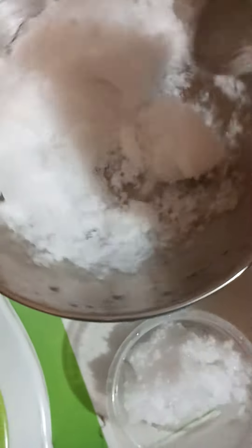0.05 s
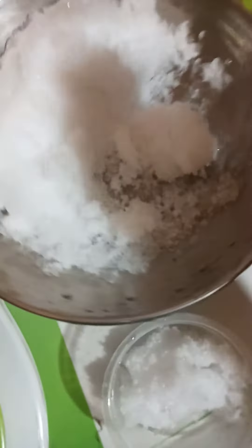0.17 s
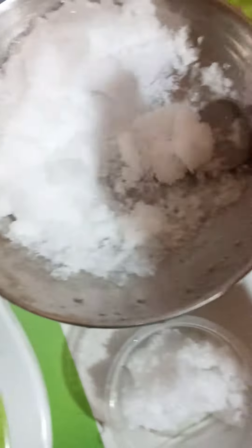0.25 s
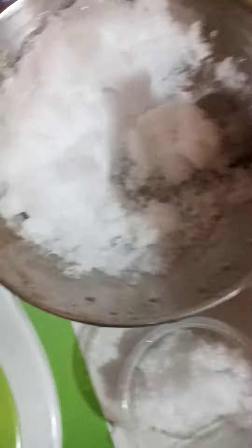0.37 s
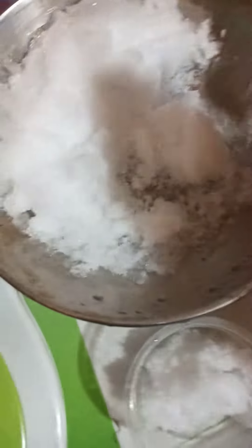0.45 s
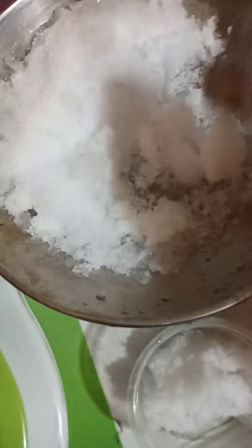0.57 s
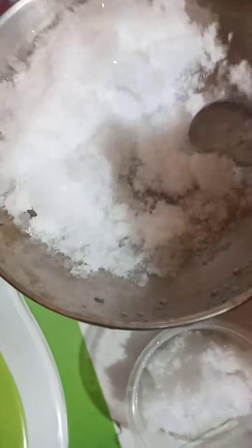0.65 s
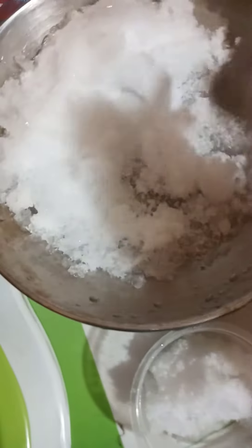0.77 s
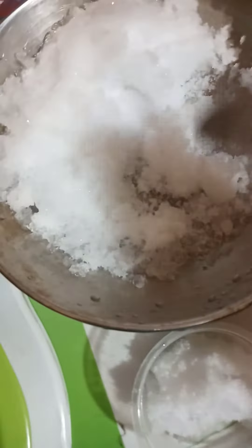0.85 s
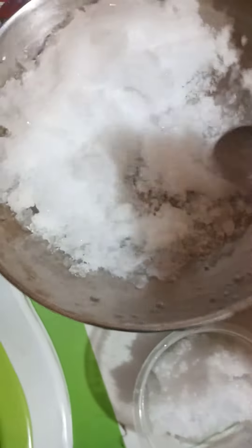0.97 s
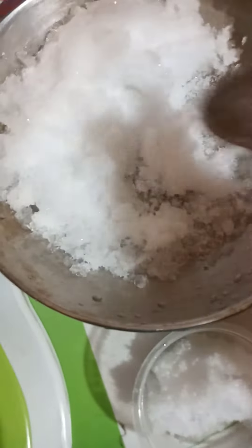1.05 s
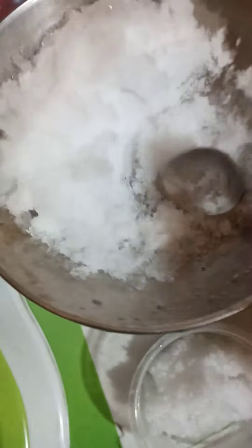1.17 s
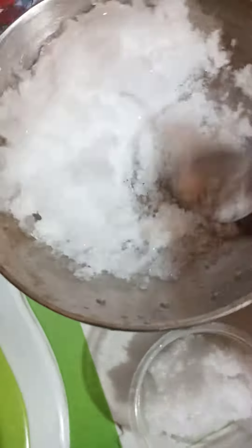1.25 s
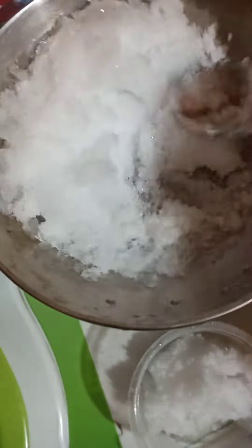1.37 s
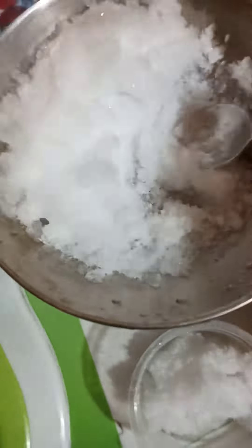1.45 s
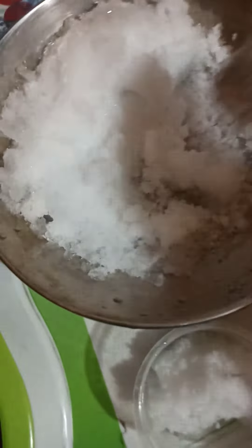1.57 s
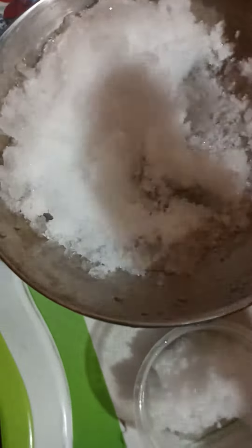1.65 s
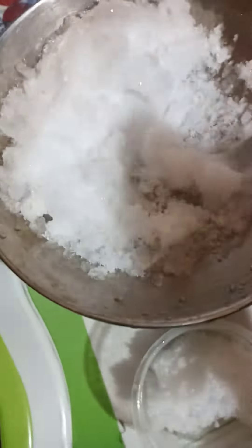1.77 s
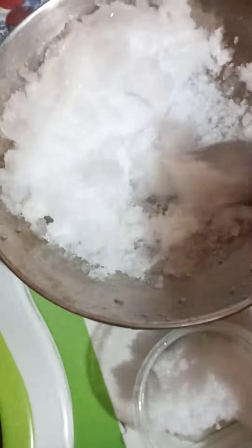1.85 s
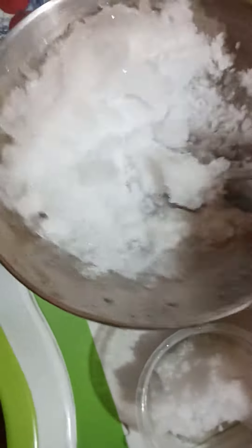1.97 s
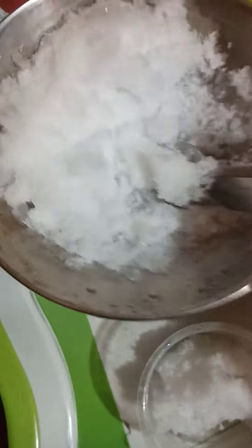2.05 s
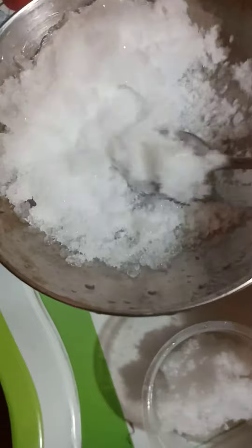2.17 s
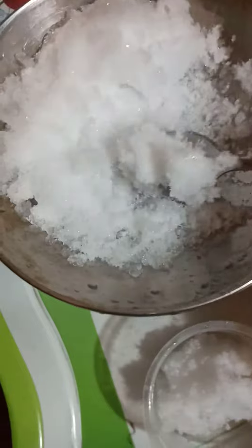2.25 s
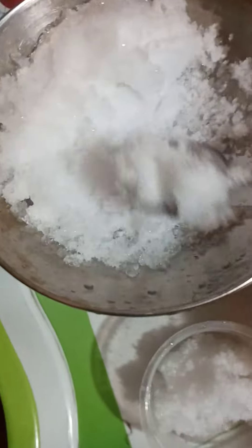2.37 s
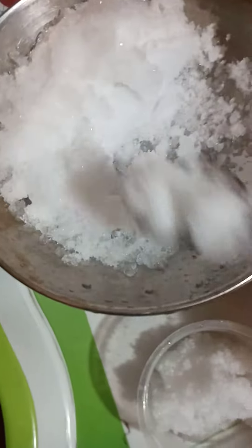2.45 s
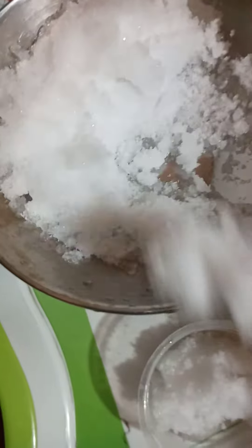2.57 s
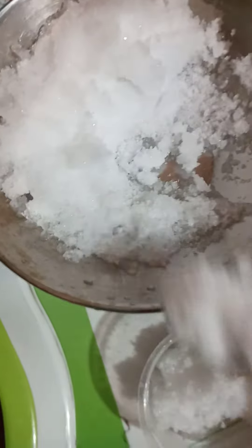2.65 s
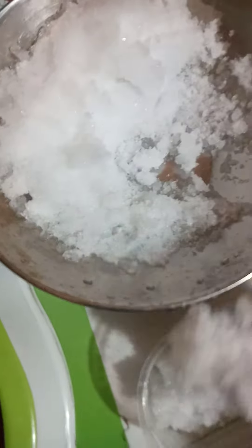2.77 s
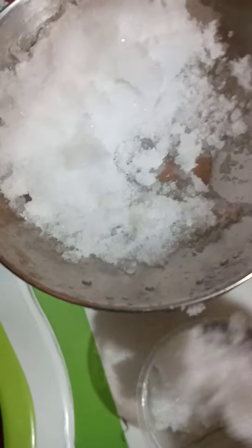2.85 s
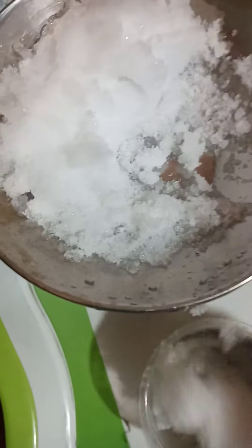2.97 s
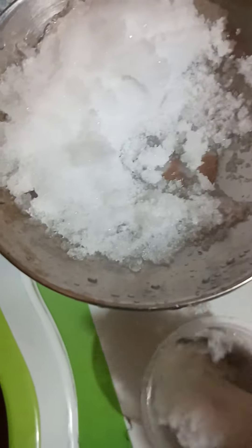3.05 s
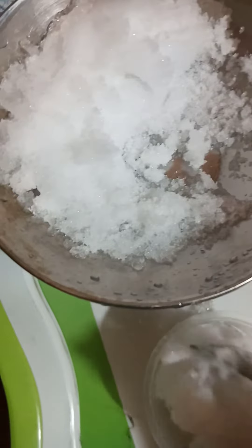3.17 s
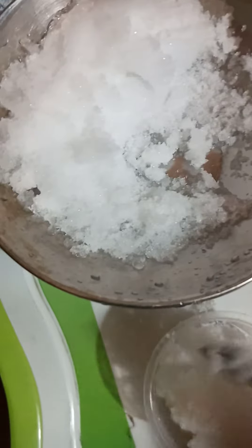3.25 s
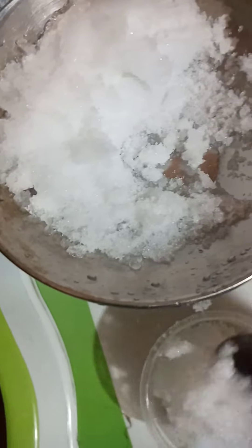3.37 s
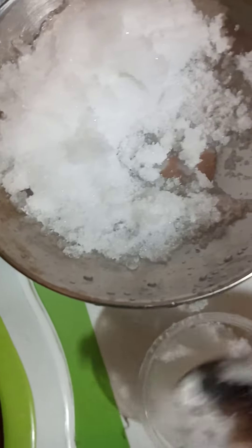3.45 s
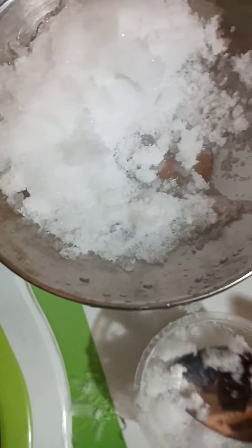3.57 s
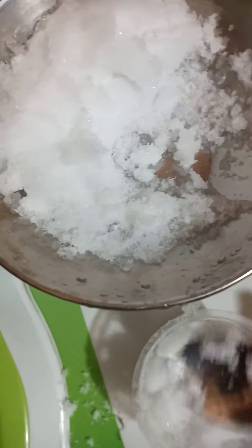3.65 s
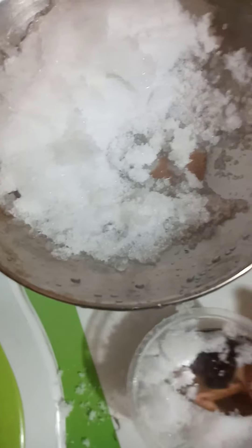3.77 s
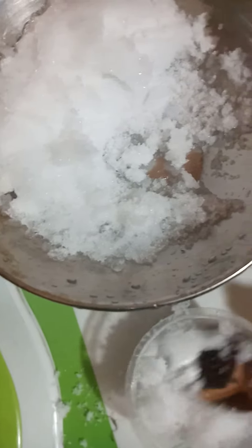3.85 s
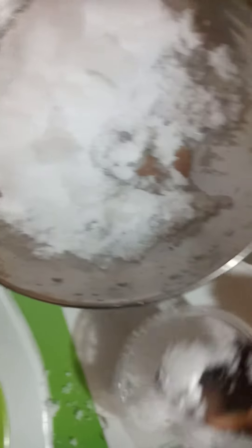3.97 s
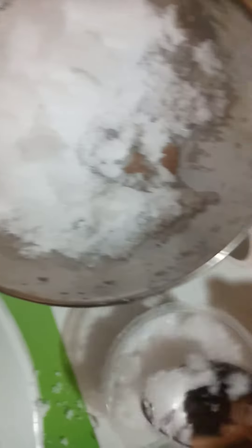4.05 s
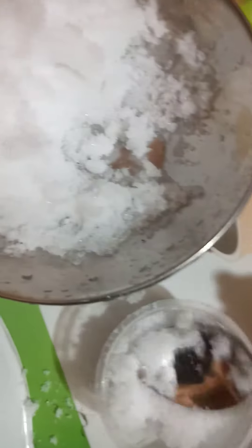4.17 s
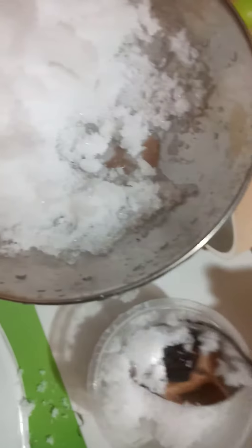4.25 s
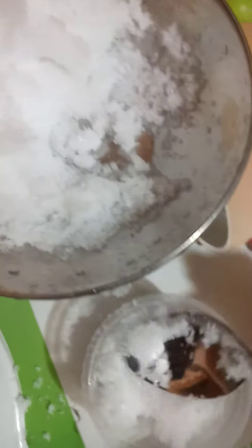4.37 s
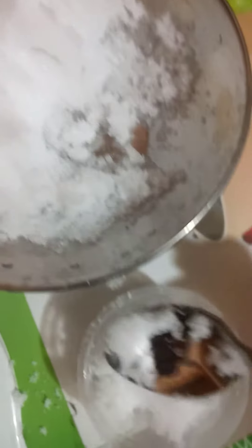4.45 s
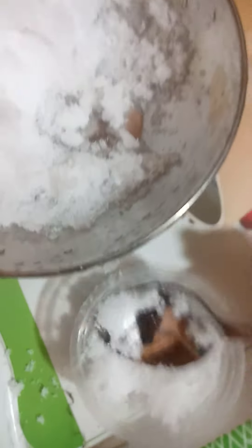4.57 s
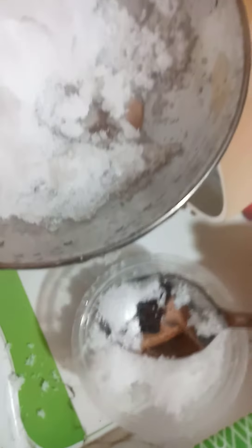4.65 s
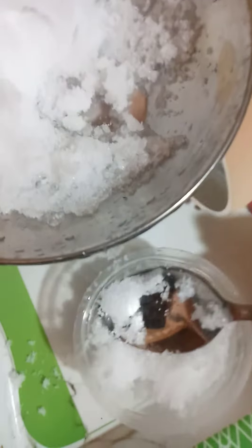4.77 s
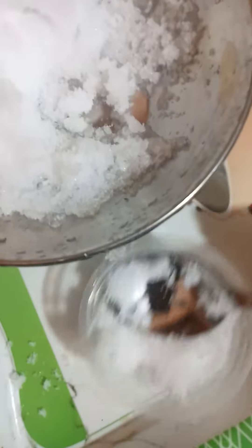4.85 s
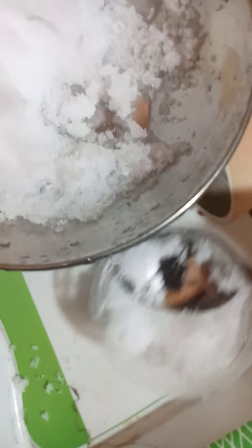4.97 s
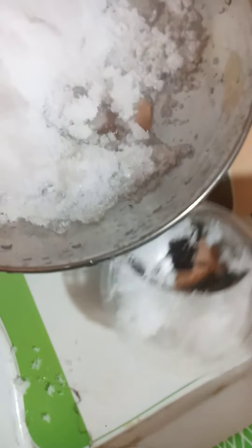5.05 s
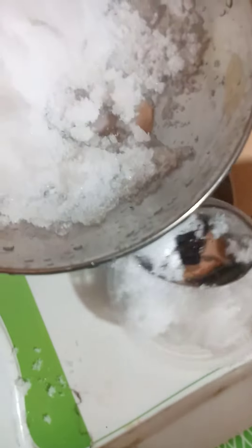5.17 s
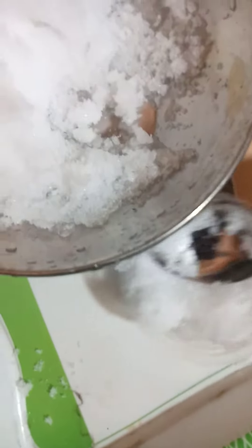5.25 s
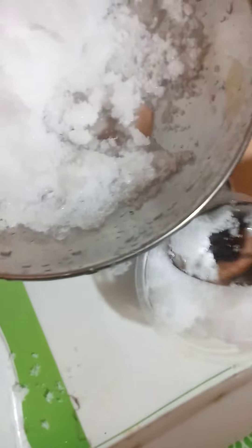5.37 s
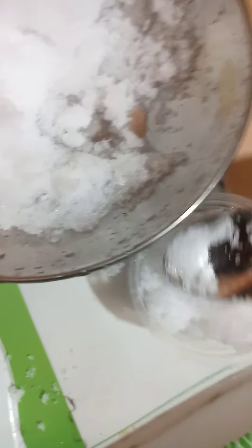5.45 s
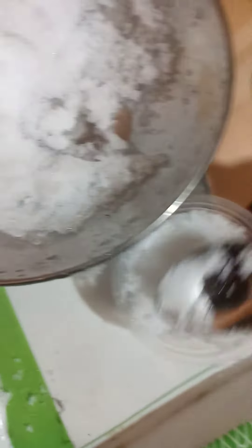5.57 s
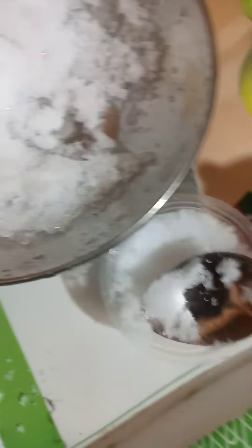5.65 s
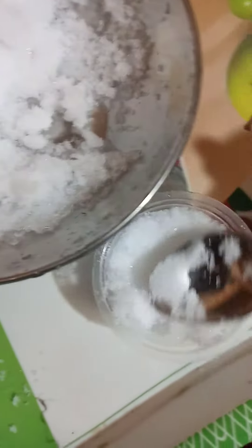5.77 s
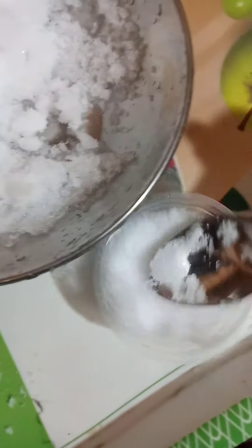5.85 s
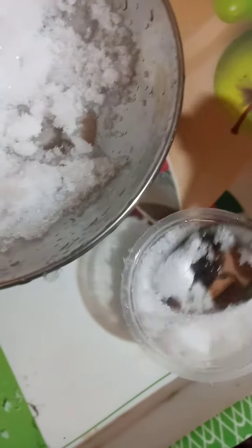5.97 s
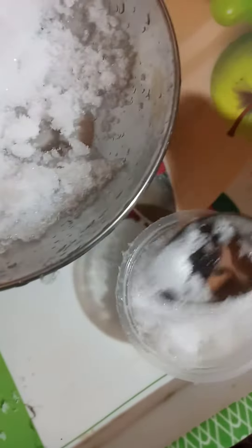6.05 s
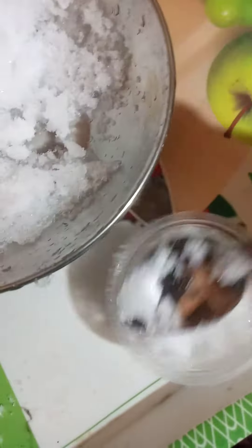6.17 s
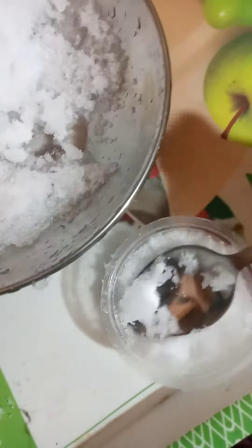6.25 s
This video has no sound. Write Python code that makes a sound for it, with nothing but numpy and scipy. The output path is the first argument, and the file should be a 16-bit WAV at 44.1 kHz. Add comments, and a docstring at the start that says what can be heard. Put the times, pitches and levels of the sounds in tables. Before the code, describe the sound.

In a small kitchen, close to a phone microphone, a spoon works coarse freezer frost in a steel bowl. From 0 to 2.1 s come uneven short scrapes and gritty crunches, with strong snaps near 0.2, 1.15, 1.4 and 1.75 s, brief damped metallic ringing and dull table thuds. It quietens around 2.1 to 2.6 s with only tiny cracks. A sharp snap at 2.65 s starts the work in the small tub: crisper, higher crunches and bright ticks around 3 s, a swelling crunch to a hard crack at 3.5 to 3.65 s, and a cluster of cracks near 4.05 to 4.15 s. From 4.6 to 5.5 s there are only faint crackles and soft pressing. Short clicks and crunches return at 5.6 to 5.9 s, and a firmer tap with a thud ends it near 6.2 s. Faint room echo, airy noise and wavering low machine hum lie underneath.

```python
"""A spoon chops and scoops freezer frost in a steel bowl, then goes on in a small tub and presses it flat.
Clumps of short grains make the crunches, pitched cracks make the snaps; decaying modes ring the vessels.
The place is a small kitchen: filtered noise gives its air, low machine drones and the thuds of the table.
The frost lies close to a phone microphone, with faint echoes of the room behind it."""
import sys
import numpy as np
from scipy import signal
from scipy.io import wavfile
from scipy.ndimage import uniform_filter1d

SR = 44100
rng = np.random.default_rng(int(sys.argv[2]) if len(sys.argv) > 2 else 0)


def unload_audio(sound):
    """Save the sound as a 16-bit wav file, at the path given as the first command line argument."""
    columns = np.transpose(np.atleast_2d(sound))
    # keep every value between -1 and 1, then stretch to whole-number steps
    steps = np.round(np.clip(columns, -1, 1) * 32767)
    wavfile.write(sys.argv[1], SR, steps.astype(np.int16))


def boost(x):
    """Linear amplitude factor 10**(x/20) for a level x in decibels (scalar or array-like)."""
    u = np.asarray(x, float) / 20
    return 10 ** u


N = 278712  # length [samples]
LEAVES_BOWL_S, PRESSING_BEGINS_S = 2.5, 2.8


def evened(x):
    """Scales to rms 1."""
    return x / np.sqrt(np.mean(x ** 2) + 1e-20)


def slow_noise(size):
    """Noise smoothed twice over size samples, rms 1: an aimless wandering."""
    once = uniform_filter1d(rng.standard_normal(N), size)
    return evened(uniform_filter1d(once, size))


def read(points, hz):
    """Reads a spectrum table on a log-frequency axis."""
    f, value = np.transpose(points)
    return np.interp(np.log(hz + 1), np.log(f + 1), value)


def level_curve(points):
    """Joins (time [s], level [dB]) points by straight lines and gives the amplitude at every sample."""
    s, db = np.transpose(points)
    return boost(np.interp(np.arange(N) / SR, s, db))


def add(mix, s, sound):
    """Mixes a sound in at time s."""
    part = mix[round(s * SR):][:len(sound)]
    part += sound[:len(part)]


def coloured(x, points):
    """A causal minimum-phase filter with the gains of a spectrum table, never below -100 dB."""
    hz = abs(np.fft.fftfreq(8192, 1 / SR))
    log_gain = np.log(boost(np.maximum(read(points, hz), -100)))
    phase = -signal.hilbert(log_gain).imag
    taps = np.fft.ifft(np.exp(log_gain + 1j * phase)).real[:4096]
    return signal.oaconvolve(x, taps)[:N]


def narrow(hz, width, steady=0.):
    """Noise in one steep resonance; steady 0-1 irons out its swells."""
    r = np.exp(-np.pi * width / SR)
    slow = rng.standard_normal(N) + 1j * rng.standard_normal(N)
    for _ in range(2):
        slow = signal.lfilter([1], [1, -r], slow)
    slow = slow / abs(slow) ** np.clip(steady, 0, 1)
    return evened((slow * np.exp(2j * np.pi * hz * np.arange(N) / SR)).real)


def peaked(peak_s, db, rise_db_per_s, fall_db_per_s):
    """A level that climbs to its peak and falls away, both at steady rates."""
    t = np.arange(N) / SR - peak_s
    return boost(db + np.where(t < 0, rise_db_per_s * t, -fall_db_per_s * t))


def resonate(x, hz, width):
    """Shifts the curve hz down to zero, smooths, and shifts back: a resonance of gain 1."""
    turn = np.exp(2j * np.pi * np.cumsum(hz) / SR)
    r = np.exp(-np.pi * width / SR)
    return 2 * (turn * signal.lfilter([1 - r], [1, -r], x / turn + 1e-18)).real


# The spoon drags through frost at even pressure:
# (start [s], length [s], relative level [dB], depth [dB], brightness [dB])
SCRAPES = [(-0.03, 0.014, -37, 14, -1), (0.146, 0.044, -40.5, 9.5, 17.5), (0.251, 0.053, -37.5, 0, 10.5),
           (0.41, 0.069, -54.5, 3.5, -1), (0.567, 0.03, -36, -14.5, 6.5), (0.586, 0.025, -29, 4.5, 4),
           (0.848, 0.023, -29, 3.5, 2.5), (0.953, 0.011, -53.5, 12.5, -6), (1.105, 0.028, -44, -8, -4),
           (1.16, 0.033, -38, 10, 3), (1.363, .048, -29.5, -1.5, 5), (1.681, 0.058, -39, 2.5, 16),
           (1.782, 0.086, -39, -6, 22), (1.892, 0.045, -36.5, 9, 7), (2.005, .012, -33, -1, 8),
           (2.042, 0.1, -49.5, 5, 0.5), (2.23, .14, -55.5, -5, 2.5), (2.648, 0.039, -35, 9, 7),
           (3.14, 0.054, -58.5, 13, -21.5), (3.408, 0.048, -44, 12, 14), (3.803, 0.022, -53, -5, 0),
           (4.023, 0.019, -46, -1.5, 2), (4.26, 0.085, -58, 4.5, -6), (4.452, 0.016, -57.5, 4, -3),
           (4.53, 0.023, -36.5, 0.5, 6.5), (4.775, 0.26, -52, -12, 4), (5.134, .13, -55.5, -10, 5),
           (5.283, 0.12, -57, -19, -2), (5.414, 0.1, -62.5, -13, -7.5), (5.598, 0.02, -53, 5.5, 4),
           (5.824, 0.033, -42, -13, 2), (5.571, 0.013, -38.5, 9, -4), (5.666, 0.0047, -31.5, 6, 3),
           (5.902, 0.012, -39.5, 2, 1), (5.993, 0.031, -55, -3, -19), (6.147, .008, -33.5, 7, -1),
           (6.199, 0.023, -33, 3.5, 4)]
# Short rises of crunching noise, each stopping abruptly; some lead into a blow:
# (peak time [s], build-up [s], relative level [dB], depth [dB], brightness [dB])
CRUNCH_RISES = [(0.52, 0.042, -57, -3, 14), (1.14, .03, -28.5, -5.5, -12.5), (1.924, 0.21, -30, -2.5, 2.5),
                (2.024, 0.017, -30, -8, -1.5), (2.431, 0.023, -60.5, 8, 6), (2.641, 0.045, -51, 4, -5.5),
                (2.844, 0.01, -39.5, 0, 1), (2.957, 0.033, -33, -9, 2), (3.008, 0.034, -33, -10, 9),
                (3.497, 0.092, -23, -1.5, -1), (3.538, 0.12, -28.5, -1, 4.5), (3.63, 0.015, -31, -14.5, 2),
                (3.853, 0.038, -40, -3, -1), (4.123, 0.11, -35.5, 9, -1), (4.531, 0.034, -31.5, -6, 0.5),
                (5.086, 0.0056, -53.5, -10, -31.5), (5.878, 0.087, -36, -3, 0)]


def pressure():
    """Adds up the power of all strokes; depth, brightness and age are their power-weighted means."""
    bite_s, build_db, let_go_db_per_s = 0.0061, 22.5, 447.5
    dull_db_per_s = 202  # the treble lets go first
    light_depth_db = -9.5  # a light touch sounds thin
    # loosened frost settles, deeper and duller
    settle_db, settle_db_per_s, settle_depth_db, settle_dull_db = -25, 148.5, 10, -2.5
    # what each snap shatters
    burst_db, burst_rise_s, burst_db_per_s = -8.5, 0.0005, 849
    burst_depth_db_per_octave, burst_bright_db = -9.5, 0
    deep, bright, age = np.zeros((3, N))
    power = np.full(N, 1e-10)

    def stroke(s, db, rise_s, held_s, fall_db_per_s, depth_db, bright_db):
        """Rise, hold, let go, settle."""
        t = np.arange(SR * 3 // 4) / SR - min(s, 0)  # an early stroke is entered part-way
        s = max(s, 0)
        light = np.maximum(1 - t / rise_s, 0)
        on_db = db - build_db * light
        depth_db = depth_db + light_depth_db * light
        after = np.maximum(t - held_s, 0)
        main = boost(on_db - fall_db_per_s * after) ** 2
        settle = boost(on_db + settle_db - settle_db_per_s * after) ** 2
        add(power, s, main + settle)
        add(age, s, (main + settle) * np.maximum(t - rise_s, 0))
        add(deep, s, main * depth_db + settle * (depth_db + settle_depth_db))
        main_bright_db = bright_db - dull_db_per_s * after
        add(bright, s, main * main_bright_db + settle * (bright_db + settle_dull_db))

    for s, length, db, depth_db, bright_db in SCRAPES:
        stroke(s, db, bite_s, bite_s + length, let_go_db_per_s, depth_db, bright_db)
    for s, build, db, depth_db, bright_db in CRUNCH_RISES:
        stroke(s - build, db, build, build, let_go_db_per_s, depth_db, bright_db)
    for s, db, hz, _ in SNAPS:
        depth_db = burst_depth_db_per_octave * np.log2(hz / 1700)
        stroke(s, db + burst_db, burst_rise_s, burst_rise_s, burst_db_per_s, depth_db, burst_bright_db)
    depth_db = np.clip(deep / power, -14, 14)
    bright_db = np.clip(bright / power, -14, 14)
    return np.sqrt(power), depth_db, bright_db, age / power


def crystals(per_s, spread_db, clump_db, cycles, depth_db, bright_db, count=32):
    """Breaking crystals: short grains of every pitch, arriving in clumps a few ms long."""
    clumps = boost(clump_db * slow_noise(70))
    # pressed frost in the tub fizzes higher
    top_db = np.where(np.arange(N) < PRESSING_BEGINS_S * SR, -3.5, 3.)
    out = np.zeros(N)
    for hz in np.geomspace(350, 16000, count):
        turns = np.arange(0, 3 * cycles * SR / hz) * hz / SR
        grain = turns * np.exp(-3 * turns / cycles) * np.sin(2 * np.pi * turns)
        grain = grain * np.sqrt(hz) / np.linalg.norm(grain)
        chance, size, sign = rng.random((3, N))
        finer = max(hz / 2500, 1)  # small crystals are more numerous
        hits = (chance < finer * per_s / SR) / np.sqrt(finer)
        hits = hits * boost(-spread_db * np.log(size + 0.0016)) * np.sign(sign - .5)
        # depth lifts the low grains, brightness the high ones
        tilt = np.interp(np.log(hz), np.log([1000, 2800, 4500, 7000]), [1, 0, 0, -1])
        tilt_db = max(tilt, 0) * depth_db + max(-tilt, 0) * bright_db + (hz > 9500) * top_db
        out += signal.oaconvolve(hits * boost(tilt_db), grain)[:N]
    return out * clumps / np.sqrt(per_s / SR * count * 5000)


# Ringing modes of the steel bowl: (frequency [Hz], relative level [dB], t60 [s])
BOWL_MODES = [(143, -4, 0.16), (317.6, -16, 0.35), (564, -13, 0.23), (813, -26, 0.18), (852.5, -0.5, 0.087),
              (936, -7.5, 0.062), (956, -13, 0.4), (1015, -0.5, 0.079), (1136, -18, 0.24),
              (1290, -23, 0.13), (1522, -10, 0.15), (1621, -7.5, 0.12), (1722, -5, 0.22), (2560, -6, .06),
              (3600, -2.5, 0.038), (4180, -36.5, .04)]
# Ringing modes of the small tub: (frequency [Hz], relative level [dB], t60 [s])
TUB_MODES = [(594, -8.5, 0.027), (1057, -3, 0.064), (1750, 2, 0.011), (2162, 8.5, 0.045), (2560, 12, 0.021),
             (2970, -16.5, 0.0038), (3310, 6.5, 0.04), (4220, -9, .06), (4970, -8, 0.047)]


def ring(modes):
    """The answer of a vessel to one tap: a sum of decaying sines, energy 1."""
    t = np.arange(SR // 2) / SR
    out = sum(boost(db - 60 * t / t60) * np.sin(2 * np.pi * hz * t) for hz, db, t60 in modes)
    return out / np.linalg.norm(out)


def vessels(taps):
    """Taps ring the bowl first and the tub later; shifting frost damps the ring unevenly."""
    in_bowl = np.arange(N) < LEAVES_BOWL_S * SR
    bowl = signal.oaconvolve(taps * in_bowl, ring(BOWL_MODES))
    tub = signal.oaconvolve(taps * ~in_bowl, ring(TUB_MODES))
    uneven_db = 5.84 * slow_noise(200)
    return (bowl + tub)[:N] * boost(uneven_db)


# Frost as the microphone hears it, for crunches and snaps alike: (frequency [Hz], gain [dB])
FROST_COLOUR = [(180, -28), (300, -13), (678, -9.5), (842, -1.5), (1190, -1.5), (1750, 2.5), (1900, 0),
                (2030, 0.5), (3030, -1), (4370, -8), (5520, -25), (7440, -22.5), (10600, -37.5),
                (15000, -36.5), (16000, -39)]


def crunch():
    """The strokes' level sets how loudly the frost gives way; it colours the hollow and rings the vessel."""
    level, depth_db, bright_db, age_s = pressure()
    frost = level * crystals(per_s=450, spread_db=3., clump_db=2.5, cycles=5.57,
                             depth_db=depth_db, bright_db=bright_db)
    # air between spoon and frost: 3450 Hz in the bowl, 3050 Hz in the tub, wandering by 4 % rms
    hz = np.where(np.arange(N) < LEAVES_BOWL_S * SR, 3450, 3050) * (1 + .04 * slow_noise(6000))
    sag_hz_per_s = 1300  # the hollow widens as a stroke goes on
    hz = uniform_filter1d(hz - sag_hz_per_s * np.minimum(age_s, .3), size=300)
    hollow = boost(-.45 * depth_db + 0.5) * resonate(frost, hz, width=450)
    heard = boost(-2.0) * coloured(frost + hollow, FROST_COLOUR)
    return heard + boost(-25.0) * vessels(frost * boost(depth_db))


# How long the room holds each pitch: (frequency [Hz], t60 [s])
ROOM_DECAY = [(300, 0.2), (1000, 0.25), (3000, 0.11), (8000, 0.12)]


def room(x):
    """Sparse echoes of random sign, each band dying at its own speed; three tails take turns."""
    out = np.zeros(N)
    for k in range(3):
        taps = np.zeros(SR // 2)
        at = np.arange(160, SR // 2 - 20, 20)
        at = at + rng.integers(0, 20, len(at))
        taps[at] = rng.choice([-1., 1.], len(at))
        hz, t, z = signal.stft(taps, SR, nperseg=256)
        decay = boost(-60 * t / read(ROOM_DECAY, hz)[:, None])
        tail = signal.istft(z * decay, SR, nperseg=256)[1]
        share = np.sqrt(2 / 3) * np.cos(np.pi * (np.arange(N) / SR * 9 + k / 3))
        out += signal.oaconvolve(x * share, tail / np.linalg.norm(tail))[:N]
    return out


def patchy(x, patchy_db):
    """The level wanders in patches over time and pitch, mostly below 2 kHz."""
    hz, _, z = signal.stft(x, SR, nperseg=1024, noverlap=768)
    field = uniform_filter1d(rng.standard_normal(z.shape), size=5, axis=0)
    field = evened(uniform_filter1d(field, size=14, axis=1))
    depth_db = patchy_db / (1 + (hz[:, None] / 2000) ** 2)
    return signal.istft(z * boost(depth_db * field), nperseg=1024, noverlap=768)[1][:N]


# Colour of the kitchen's air: (frequency [Hz], gain [dB])
AIR_COLOUR = [(15, -42.5), (25, -45), (145, 0), (285, -6.5), (439, -35), (575, -18.5), (962, -30),
              (1520, -19), (3340, -19), (5570, -45.5), (8140, -42.5), (14800, -100.5), (16000, -56)]


def room_air():
    """Coloured noise whose level wanders in patches."""
    air = patchy(coloured(rng.standard_normal(N), AIR_COLOUR), patchy_db=7.0)
    return boost(-54.5) * evened(air)


# Colour of the low rumble shared by the drone and the table: (frequency [Hz], gain [dB])
RUMBLE_COLOUR = [(35, -29), (60, -12), (139, 4), (187, -2.5), (257, -11), (312, -8), (344, -14.5),
                 (500, -19), (650, -15), (1100, -120)]


def rumble():
    """Low coloured noise, and apart from it a narrow resonance."""
    wood = evened(coloured(rng.standard_normal(N), RUMBLE_COLOUR))
    return wood, narrow(hz=152.8, width=14.0, steady=0.34)


# Low machine drone near 72 Hz: (time [s], level [dB])
LOW_DRONE = [(0.0, -70), (0.5, -56.5), (1.2, -58), (2.0, -58.5), (2.6, -62.5), (2.85, -53.5), (4.15, -56),
             (4.9, -64.5), (5.2, -91), (6.25, -60)]
# Upper drone, rumble with tones near 153 and 164 Hz: (time [s], level [dB])
UPPER_DRONE = [(0, -84.5), (2.0, -55.5), (2.55, -64.5), (3.25, -54.5), (4.0, -56), (4.3, -53), (4.7, -56.5),
               (5.65, -46), (6.32, -50)]


def drones(wood, upper):
    """Two wavering drones of narrow noise, the upper one mixed with the rumble."""
    low_hum = narrow(hz=72, width=2.8, steady=0.34)
    upper_hum = evened(wood + 0.42 * upper + .7 * narrow(hz=163.6, width=6.3, steady=.6))
    return level_curve(UPPER_DRONE) * upper_hum + level_curve(LOW_DRONE) * low_hum


# The table thuds under the vessels: (peak time [s], level [dB])
THUDS = [(0.02, -40.5), (0.175, -35.5), (0.23, -35.5), (0.622, -36.5), (0.882, -32.5), (0.999, -39),
         (1.181, -32.5), (1.43, -41), (1.778, -31.5), (2.02, -51.5), (2.67, -50), (3.63, -48),
         (4.061, -41.5), (4.15, -43.5), (4.558, -44.5), (5.688, -45.5), (5.899, -46), (6.198, -33)]


def thuds(wood, upper):
    """Blows through the table: swells of the rumble, their powers added."""
    power = sum(peaked(s, db, rise_db_per_s=493, fall_db_per_s=144) ** 2 for s, db in THUDS)
    return np.sqrt(power) * evened(wood + 0.36 * upper)


# Single breaks and blows:
# (time [s], relative level [dB], centre frequency [Hz], ring of the vessel relative to the break [dB])
SNAPS = [(0.157, -15.5, 1055, -4), (0.219, -5, 975, -18), (0.932, -31.5, 813, -15), (1.128, -20, 3220, -11),
         (1.144, -3.5, 2070, -3), (1.412, -6, 930, -3), (1.69, -31.5, 1650, 2), (1.719, -46.5, 1770, 17),
         (1.766, -4, 988, -5.5), (2.026, -28.5, 2460, 2.5), (2.229, -41.5, 3400, -7.5),
         (2.246, -44.5, 690, -20), (2.299, -35.5, 2700, -21.5), (2.352, -39.5, 3260, -17.5),
         (2.424, -44.5, 3450, -5), (2.647, -5.5, 2700, -11), (2.702, -35, 4300, 0), (2.843, -29, 3280, -23),
         (2.901, -38, 3550, -38), (2.933, -33, 1610, -25), (2.955, -29.5, 1570, 0),
         (3.004, -21, 3540, -6.5), (3.044, -48, 3040, -11.5), (3.145, -41.5, 1800, 4),
         (3.178, -36, 1790, 2), (3.23, -41, 1750, -16), (3.263, -49, 1640, 4), (3.396, -38, 1750, -19),
         (3.411, -43, 2660, -11.5), (3.634, -5.5, 2730, -21), (3.706, -34.5, 3140, -19),
         (3.91, -35.5, 2560, -42), (4.023, -52, 2550, -15), (4.046, -12.5, 1920, 1),
         (4.065, -30, 1700, -13.5), (4.103, -22.5, 2550, -8), (4.118, -16.5, 1750, 2.5),
         (4.152, -27.5, 2560, 0), (4.252, -36.5, 2180, -44), (4.306, -39.5, 1750, -2),
         (4.334, -40, 2550, -24), (4.36, -44, 2970, -1), (4.381, -47, 2160, -19), (4.57, -33.5, 3310, 9.5),
         (5.046, -39.5, 3480, -14), (5.055, -40, 3500, -27), (5.083, -40, 2580, -19),
         (5.328, -39, 2900, -14), (5.356, -42, 1750, 18), (5.384, -32, 1690, -9), (5.48, -41, 2270, -6),
         (5.583, -21.5, 1570, 6), (5.673, -20.5, 2720, 6), (5.883, -18, 2560, 3.5), (5.99, -34, 2470, -8),
         (5.998, -49, 2660, -12), (6.042, -33, 2800, -38), (6.154, -20, 2500, -8), (6.184, -9, 2250, -5)]


def snaps():
    """Each snap is a short pitched crack with a click, a trail of crumbling and a tap on the vessel."""
    cracks, clicks, trail, taps = np.zeros((4, N))
    t = np.arange(SR // 3) / SR
    for s, db, hz, ring_db in SNAPS:
        rise = 1 - np.exp(-t * hz / 0.39)  # a soft start keeps the crack narrow
        crack = rise * np.exp(-t * hz / 2.77) * np.sin(2 * np.pi * hz * t)
        add(cracks, s, boost(db + 1.5) * crack)
        add(clicks, s, boost(db) * np.exp(-t[:90] / 0.0011) * rng.uniform(-0.89, 1, size=90))
        add(trail, s, boost(db - 19.5 - t / 0.0007))  # crumbling dies in about 40 ms
        add(taps, s, boost([db + ring_db]))
    crumbs = trail * crystals(per_s=630, spread_db=4.0, clump_db=2.5, cycles=3.6,
                              depth_db=8.0, bright_db=2.0)
    # a blunt tap drives little treble: (frequency [Hz], gain [dB])
    blunt = [(20, 2.0), (3800, -7.0), (6000, -32), (20000, -50)]
    ring_out = coloured(vessels(taps), blunt)
    return coloured(cracks + boost(3.5) * clicks + crumbs, FROST_COLOUR) + boost(13.5) * ring_out


# Tiny crystals ticking in the treble: (time [s], relative level [dB])
TICKS = [(0.5177, -56), (0.9752, -62), (1.044, -60), (2.2298, -56), (2.2964, -58), (2.823, -59),
         (2.8986, -50.5), (2.9534, -39), (3.0457, -48), (3.0554, -57), (3.2296, -55.5), (3.266, -57),
         (3.2874, -55), (3.3638, -58), (3.8182, -63), (3.9095, -75), (4.3051, -59), (4.3605, -67),
         (4.3836, -75), (5.0568, -47), (5.3532, -53), (5.3844, -70), (5.4799, -68), (5.7329, -61),
         (5.9878, -61), (6.0034, -65), (6.0397, -75)]
# Colour of the ticks: (frequency [Hz], gain [dB])
TICK_COLOUR = [(1500, -24), (4000, 0), (8000, 0.5), (11000, -22), (15000, 2), (16000, -15)]


def ticks():
    """Very short bright clicks: noise dying with a time constant of 2.1 ms."""
    out, t = np.zeros(N), np.arange(300) / SR
    for s, db in TICKS:
        noise = rng.uniform(-1.3, 1, 300)
        add(out, s, boost(db + 6.0) * np.exp(-t / 0.0021) * noise)
    return coloured(out, TICK_COLOUR)


def faint_tone():
    """A faint tone of narrow noise near 580 Hz swells once."""
    swell = peaked(2.49, -57.5, rise_db_per_s=104.5, fall_db_per_s=193.5)
    return swell * narrow(hz=582, width=22)


def scene():
    """Frost close to the microphone, its echoes, and the background of the kitchen."""
    frost = crunch() + snaps() + ticks()
    wood, upper = rumble()
    background = room_air() + drones(wood, upper) + thuds(wood, upper) + faint_tone()
    return (frost + boost(-10.0) * room(frost) + background)[None]


def suppressed(x, margin_db, cut_db):
    """Noise suppressor: bins near their own quiet level are turned down, above the bass."""
    hz, _, z = signal.stft(x, SR, nperseg=1024, noverlap=768)
    power = uniform_filter1d(uniform_filter1d(abs(z) ** 2, size=9, axis=0), size=5, axis=1)
    power_db = 10 * np.log10(power + 1e-20)
    over_db = power_db - np.percentile(power_db, 15, axis=1, keepdims=True)
    above_bass = np.clip(hz[:, None] / 150 - 1.5, 0, 1)
    share = np.clip(1.5 - over_db / margin_db, 0, 1) * above_bass
    return signal.istft(z * boost(-cut_db * share), nperseg=1024, noverlap=768)[1][:N]


def low_pass(x):
    """Removes everything above the highest recorded frequency."""
    return signal.sosfilt(signal.butter(12, 16470, fs=SR, output="sos"), x)


def record(dry):
    """Phone microphone: steep low and high cuts, soft overload, noise suppressor, noise of the electronics."""
    cut = signal.sosfilt(signal.butter(8, 66, "high", fs=SR, output="sos"), dry[0])
    cut = signal.sosfilt(signal.ellip(8, .5, 40, 15600, fs=SR, output="sos"), cut)
    cut = .98 * np.tanh(cut / .98)
    # colour of the electronics: (frequency [Hz], gain [dB])
    hiss_colour = [(10, -5.5), (60, -1), (200, -26), (8000, -43.5), (16000, -33.5), (20000, -66.5)]
    hiss = evened(coloured(rng.standard_normal(N), hiss_colour))
    mix = suppressed(cut, margin_db=2.5, cut_db=1.5) + boost(-76) * hiss
    return low_pass(mix)


dry = scene()
out = record(dry)
unload_audio(out)
```